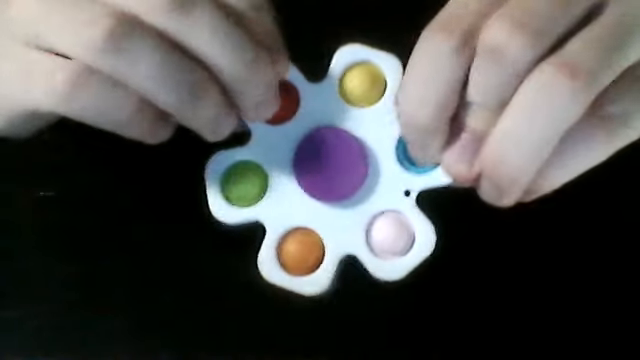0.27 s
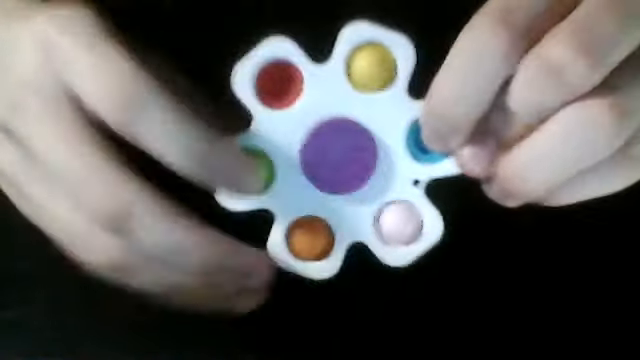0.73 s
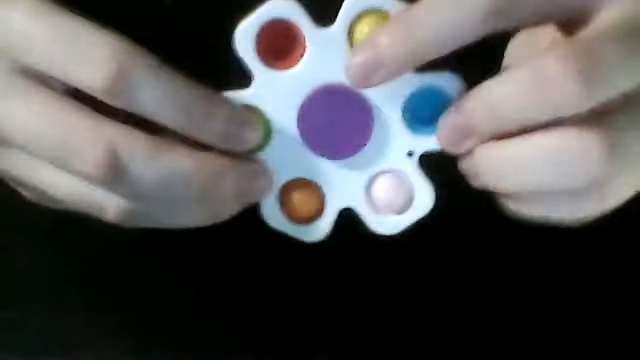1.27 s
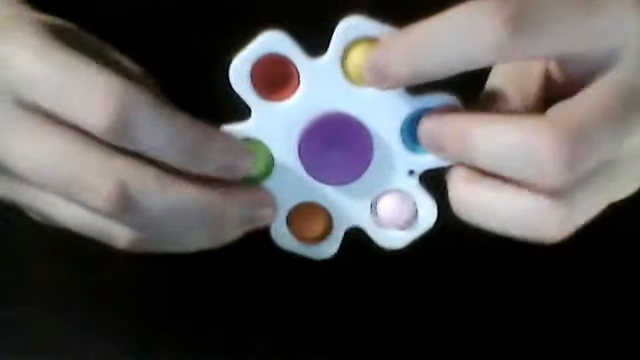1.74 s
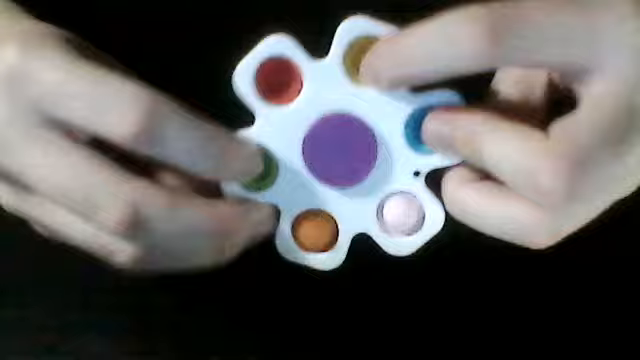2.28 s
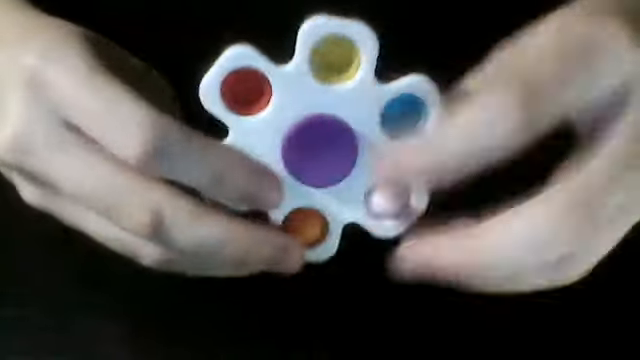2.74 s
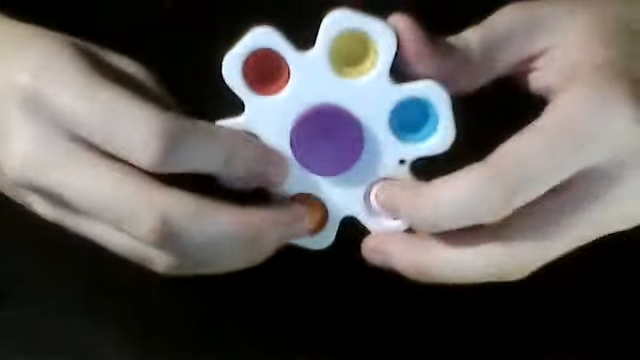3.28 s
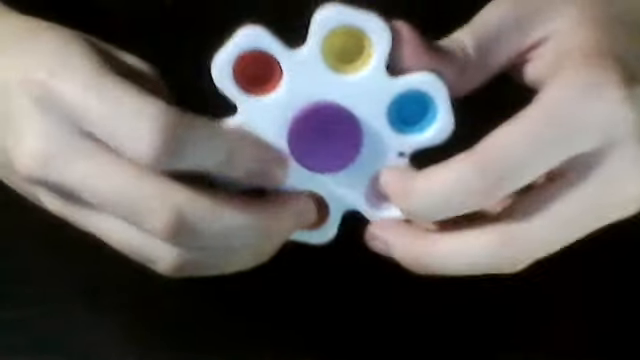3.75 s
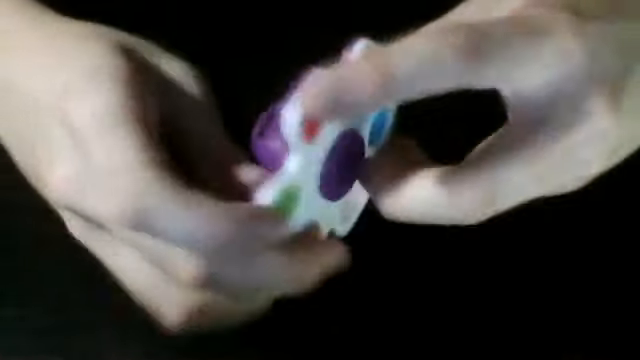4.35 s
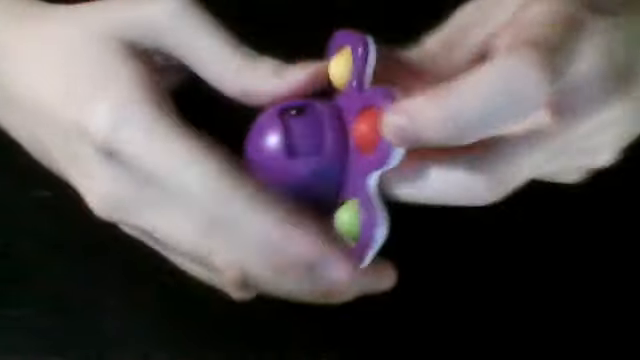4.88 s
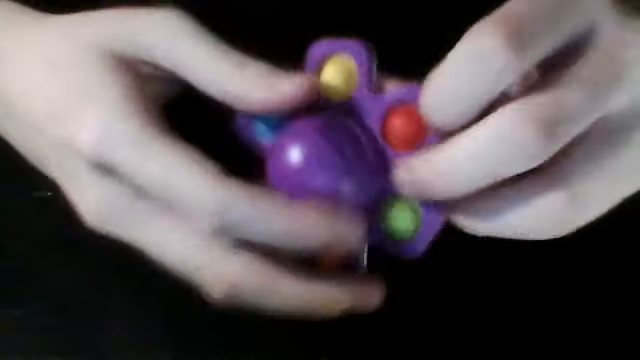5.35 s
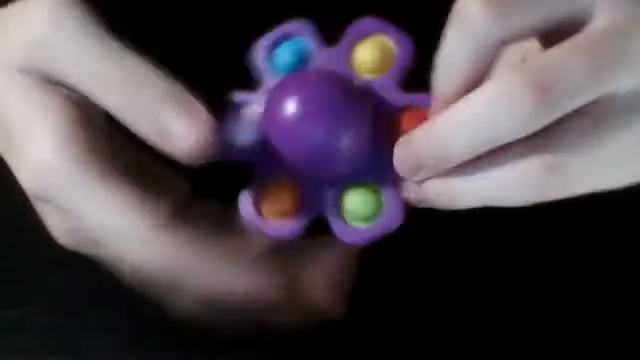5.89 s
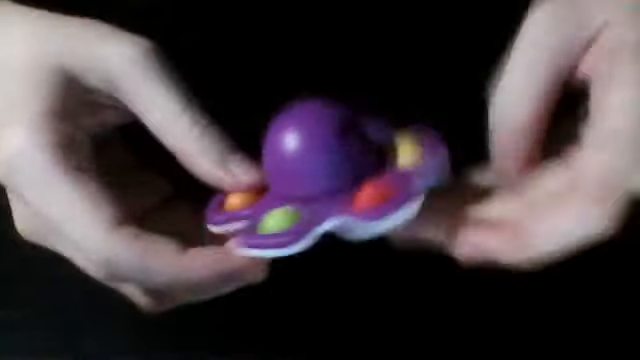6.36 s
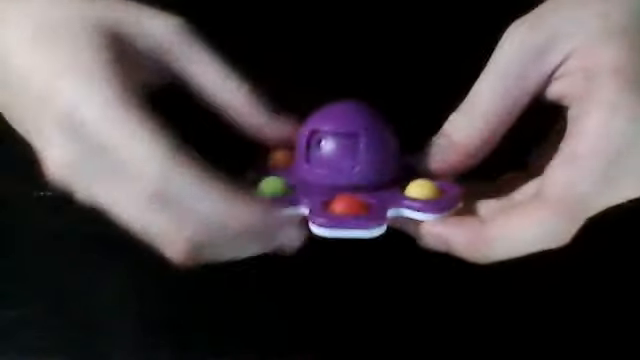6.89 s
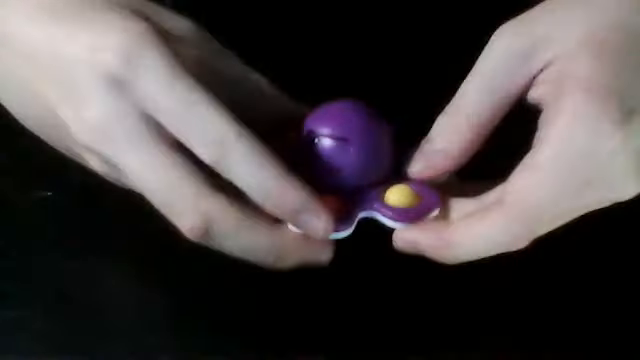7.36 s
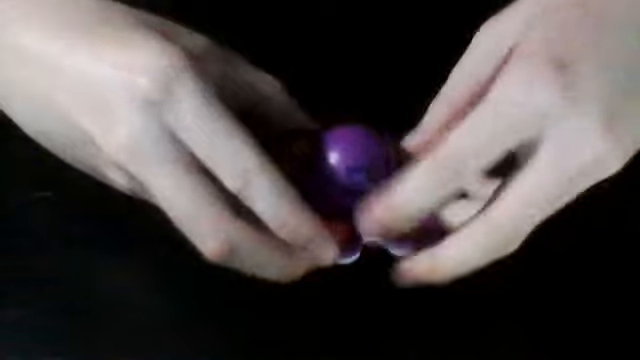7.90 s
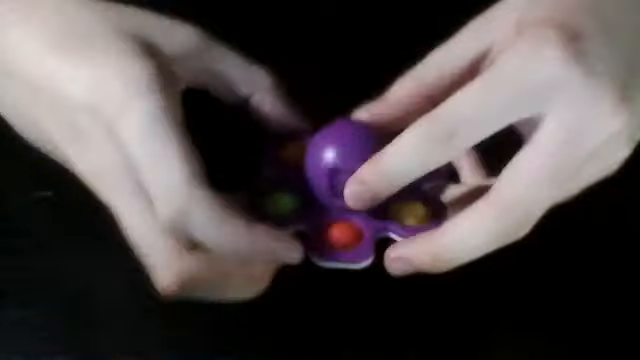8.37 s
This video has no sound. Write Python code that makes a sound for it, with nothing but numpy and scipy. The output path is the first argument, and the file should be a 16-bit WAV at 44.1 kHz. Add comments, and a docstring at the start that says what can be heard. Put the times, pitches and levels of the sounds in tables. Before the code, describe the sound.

Hands snap plastic fidget bubbles with crisp clicks, then turn the toy over with tiny rattles and soft scrapes above faint room hum.

```python
"""A quiet room: two hands play with a plastic pop fidget toy close to a small microphone.
Six silicone bubbles snap through, each a filtered impulse ringing the bubble's modes; the room rings after.
The toy is also turned over: loose parts tick in chattering contacts, fingers stick and slip on the shell.
Under it lie soft hand bumps, steady air, a faint machine hum and the low boom of the desk."""
import sys
import numpy as np
from scipy import signal
from scipy.fft import rfft, irfft
from scipy.io import wavfile

SR = 44100
rng = np.random.default_rng(int(sys.argv[2]) if len(sys.argv) > 2 else 0)


def unload_audio(sound):
    """Save the sound as a 16-bit wav file, at the path given as the first command line argument."""
    columns = np.transpose(np.atleast_2d(sound))
    # keep every value between -1 and 1, then stretch to whole-number steps
    steps = np.round(np.clip(columns, -1, 1) * 32767)
    wavfile.write(sys.argv[1], SR, steps.astype(np.int16))


N = 380141
TIME = np.arange(N) / SR
HIT_SIZE = 4096  # samples in one hit
HIT_TIME = np.arange(HIT_SIZE) / SR
HIT_HZ = np.fft.rfftfreq(HIT_SIZE, 1 / SR)
LEAD_S = .002  # room for the filter ringing ahead of a hit


def pops(bounce_s=.0004, bounce=0.76, low_hz=500, soft_hz=7800,
         hollow_dips=((810, 150, .6), (1890, 170, .85), (3100, 220, .65)),
         detune=.02, scatter_db=4.0, dip_depth=.85, dip_width_hz=450, trim_db=1):
    """Each snap rings the bubble and bounces between the fingers; the shell cuts dips (Hz, width Hz, depth)."""
    # bubbles snapping through: (time [s], centre of a treble dip in this pop [Hz], then 10 ms rms before trim:
    # thud [dB], body [dB], ring [dB], clack [dB], crack [dB], edge [dB])
    snaps = [(0.1631, 4250, -35.5, -30, -28, -27.5, -30, -31.5),
             (0.3276, 3650, -37, -28.5, -27, -25, -33.5, -36),
             (2.1152, 5350, -36.5, -28, -30, -30, -40.5, -34.5),
             (2.1386, 5150, -41, -36.5, -38.5, -35.5, -38, -38.5),
             (3.5004, 3550, -39.5, -28.5, -30, -29.5, -31, -36),
             (3.5596, 5750, -42.5, -31, -33, -33.5, -45.5, -46)]
    # limits of those six bands: (frequency [Hz])
    edges_hz = [300, 900, 2000, 3300, 5000, 6200, 9000]
    # modes of a bubble, before detune and scatter: (frequency [Hz], width [Hz], relative level [dB])
    bubble_modes = [(656, 111.5, -3.5), (1028, 190, -4), (1480, 610, -1), (1705.5, 240, 0), (2196, 260, -5),
                    (2420, 190, -2), (2560, 240, 0), (3360, 396, -8), (3790, 380, -4.5), (4680, 450, -1.5),
                    (5000, 510, -8.5), (5580, 440, -5.5), (6660, 340, -1.5), (6830, 370, -8)]

    hollow = 1
    for hz, width_hz, depth in hollow_dips:
        hollow = hollow * (1 - depth * resonance(HIT_HZ, hz, width_hz))
    # the snap takes a finite time, so the very top is weak
    softness = 1 / np.sqrt(1 + (HIT_HZ / soft_hz) ** 20)
    outlet = highpass(HIT_HZ, low_hz, order=5) * hollow * softness

    out = np.zeros(N)
    mode_hz, mode_width_hz, mode_db = np.transpose(bubble_modes)
    for time_s, dip_hz, *band_db in snaps:
        # each press stretches the membrane a little differently
        stretch, weight = rng.standard_normal((2, len(bubble_modes)))
        pressed_hz = mode_hz * (1 + detune * stretch)
        pressed_db = mode_db + scatter_db * weight
        body = ring(HIT_HZ, zip(pressed_hz, mode_width_hz, pressed_db))
        delay = np.exp(-2j * np.pi * HIT_HZ * bounce_s * rng.uniform(.8, 1.4))
        bounces = (bounce - delay) / (1 - bounce * delay)  # allpass
        treble_dip = 1 - dip_depth * resonance(HIT_HZ, dip_hz, dip_width_hz)
        snap = body * outlet * treble_dip * bounces
        add(out, strike(snap, edges_hz, band_db), time_s - LEAD_S)
    return out * undb(trim_db)


def ticks(chatter=0.18, spread_db=6, trim_db=0):
    """A first contact and a dying chatter of smaller ones ring the shell."""
    # knocks of loose plastic parts:
    # (time [s], 10 ms rms of ring [dB], crack [dB], edge [dB], chatter decay time [s])
    knocks = [(0.421, -52, -60, -60, 0.0024), (0.432, -47, -58, -60, 0.002),
              (0.558, -66.5, -80, -80, 0.0018), (0.815, -65.5, -76, -61, 0.011),
              (0.83, -53, -72, -49.5, 0.0025), (0.855, -59.5, -82, -80, 0.0064),
              (1.072, -73, -74.5, -58, 0.0041), (1.369, -71.5, -73, -72.5, 0.0063),
              (1.566, -76.5, -73, -55, 0.0018), (2.7099, -51.5, -52.5, -47.5, 0.0056),
              (2.714, -53.5, -48, -53, 0.0028), (2.741, -53.5, -55, -62, 0.014),
              (2.752, -53, -62, -56.5, 0.0021), (2.816, -61, -73, -59.5, 0.0074),
              (4.248, -74.5, -71, -73, 0.0071), (4.308, -66, -80, -67.5, 0.0047),
              (4.456, -63.5, -82, -77, 0.0055), (4.933, -58, -57, -70, 0.009),
              (5.176, -76, -75, -89.5, 0.0049), (5.426, -72.5, -73, -92, 0.0044),
              (5.812, -58.5, -67, -79, 0.013), (5.865, -62, -64, -89, 0.0066),
              (6.013, -60.5, -53, -81, 0.0088), (6.06, -58, -53.5, -78, 0.017),
              (6.26, -82, -71.5, -79, 0.0032), (6.714, -61, -71, -66.5, 0.0072),
              (6.757, -65.5, -83, -75, 0.0094), (6.835, -60.5, -76, -58.5, 0.025),
              (6.906, -64, -76, -80, 0.0079), (8.232, -67, -71, -86, 0.0033),
              (8.526, -59, -57.5, -61.5, 0.003)]
    # limits of those three bands: (frequency [Hz])
    edges_hz = [2100, 3300, 6600, 9000]

    out = np.zeros(N)
    body = shell(HIT_HZ)
    for time_s, *band_db, decay_s in knocks:
        sign, size = rng.standard_normal((2, HIT_SIZE))
        roughness = unit(sign * undb(spread_db * size))
        contacts = chatter * roughness * np.exp(-HIT_TIME / decay_s)
        contacts[0] += 1  # first contact
        add(out, strike(rfft(contacts) * body, edges_hz, band_db), time_s - LEAD_S)
    return out * undb(trim_db)


def rubbing(slips_per_s=600, spread_db=4, catches_per_s=70, catch_db=12, trim_db=-1,
            edge_hz=(5500, 7200), dome_hz=4910, dome_width_hz=240):
    """Skin sticks and slips on the shell in many tiny uneven steps, and now and then catches harder."""
    # finger slides: (time of peak [s], peak rms before trim [dB], attack [s], release [s],
    # top sizzle relative to body [dB], round dome's ring relative to body [dB])
    slides = [(0.835, -63, 0.016, 0.023, 2, -20), (0.915, -64, .02, 0.045, 3, -20),
              (1.1, -71, .015, .04, -6, -22), (1.29, -73, 0.022, 0.028, -7, -20),
              (1.58, -65.5, 0.027, 0.024, 10, -20), (2.713, -56, 0.01, .03, -1, -19),
              (2.83, -67.5, .04, 0.07, -6, -20), (4.3, -77, 0.055, 0.052, -1, -15),
              (4.487, -67.5, .012, .025, 5, -17), (4.62, -76, .02, 0.049, -2.5, -20),
              (4.805, -66.5, .004, 0.033, 6, -15), (4.99, -71, 0.041, 0.033, -12.5, -13),
              (5.825, -63.5, 0.058, .035, -10, -4), (6.06, -62.5, 0.062, 0.054, -13, -5),
              (6.845, -64, 0.024, 0.046, -3, -11), (8.28, -74.5, 0.036, 0.043, 2, -8),
              (8.52, -58, 0.011, 0.039, -3, -19)]

    f = np.fft.rfftfreq(N, 1 / SR)
    small_steps = rng.random(N) < slips_per_s / SR
    catches = rng.random(N) < catches_per_s / SR
    steps = small_steps + undb(catch_db) * catches
    signs = rng.choice([-1, 1], N)
    slips = rfft(steps * signs * undb(spread_db * rng.standard_normal(N)))

    scrape = slips * shell(f)
    top = np.interp(f, edge_hz, [0, 1])
    body = unit(irfft(scrape * (1 - top), N))
    sizzle = unit(irfft(scrape * top, N))
    dome = unit(irfft(slips * resonance(f, dome_hz, dome_width_hz), N))

    out = np.zeros(N)
    for time_s, peak_db, attack_s, release_s, sizzle_db, dome_db in slides:
        # nails sizzle, soft finger pads do not; the dome rings when it is free of the hand
        colour = unit(body + undb(sizzle_db) * sizzle + undb(dome_db) * dome)
        out += undb(peak_db) * swell(time_s, attack_s, release_s) * colour
    return out * undb(trim_db)


def creaks(per_s=9, spread_db=3.5, level_db=-92, dull_hz=5000):
    """The shifting grip sets off tiny stray ticks in the shell, muffled by the fingers."""
    f = np.fft.rfftfreq(N, 1 / SR)
    slips = (rng.random(N) < per_s / SR) * undb(spread_db * rng.standard_normal(N))
    muffling = 1 / (1 + 1j * f / dull_hz) ** 2
    return unit(irfft(rfft(slips) * shell(f) * muffling, N)) * undb(level_db)


def shell(f, low_hz=2200):
    """Response of the stiff shell, which speaks only in the treble."""
    # modes of the hard shell, before the highpass: (frequency [Hz], width [Hz], relative level [dB])
    shell_modes = [(1439, 180, -14), (2249, 140, -26), (2720, 66, -6), (2838, 63, 3.5), (2906, 43, -1.5),
                   (3690, 250, -16), (4692, 100, -16.5), (4947, 93, -11), (5515, 90, -15.5),
                   (6250, 220, -12.5), (6600, 200, -10.5), (6840, 260, -8), (7220, 200, 2.5),
                   (7337, 160, -4), (8700, 760, -14.5)]
    return ring(f, shell_modes) * highpass(f, low_hz, order=3)


def strike(spectrum, edges_hz, band_db):
    """One hit as a waveform; where and how hard it lands sets the strength of each band."""
    bands = list(zip(edges_hz[:-1], edges_hz[1:]))
    power = [np.sum(abs(spectrum[(HIT_HZ >= lo) & (HIT_HZ < hi)]) ** 2) for lo, hi in bands]
    now_db = 10 * np.log10(2 * np.array(power) / HIT_SIZE / (.01 * SR))  # rms over 10 ms
    # gain slides from band centre to band centre
    gain = undb(np.interp(HIT_HZ, np.mean(bands, axis=1), np.array(band_db) - now_db))
    lead = np.exp(-2j * np.pi * HIT_HZ * LEAD_S)
    return irfft(spectrum * gain * lead)


def ring(f, modes):
    """Response of a body with these modes."""
    return sum(undb(db) * resonance(f, hz, width_hz) for hz, width_hz, db in modes)


def resonance(f, hz, width_hz):
    """Response of one damped mode, gain 1 at its centre."""
    return 1j * f * width_hz / (hz ** 2 - f ** 2 + 1j * f * width_hz)


def highpass(f, hz, order):
    """Butterworth response of a small body that radiates weakly below hz."""
    return signal.freqs(*signal.butter(order, hz, "high", analog=True), f)[1]


def swell(time_s, attack_s, release_s):
    """Gain that builds up to 1 at time_s and dies away after it."""
    return np.exp(-np.maximum((time_s - TIME) / attack_s, (TIME - time_s) / release_s))


def undb(db):
    """Decibels to gain."""
    return 10 ** (np.asarray(db) / 20)


def unit(x):
    """Scale to rms 1."""
    return x / np.sqrt(np.mean(x ** 2))


def add(out, x, time_s):
    """Mix x into out at time_s."""
    i = int(time_s * SR)
    out[i:i + len(x)] += x[:N - i]


def room(x, desk_s=.0064, desk_db=-25, wall_s=0.011, build_s=0.0096, wet_db=-13, near_db=-3):
    """One return from the desk, then the walls answer with a dense ring that builds and fades."""
    # the room's ring: (band centre [Hz], t60 [s], relative level [dB])
    room_bands = [(445.5, 0.22, -4), (600, 0.3, 4), (730, 0.46, 0), (940, 0.46, 1), (1380, .36, -2.5),
                  (1750, 0.43, -0.5), (2231, 0.32, -3), (2751, 0.41, -1), (3570, 0.31, -3.5),
                  (4338, 0.32, 0.5), (4987, 0.31, -2), (5909, 0.4, -2), (6376, 0.27, -0.5),
                  (8000, 0.28, 0.5)]

    t = np.arange(SR * 3 // 4) / SR
    f = np.fft.rfftfreq(len(t), 1 / SR)
    noise = rfft(rng.standard_normal(len(t)))
    centres_hz = [row[0] for row in room_bands]
    tail = np.zeros(len(t))
    # each share is 1 at its own centre and 0 at the others
    for share, (_, t60_s, db) in zip(np.eye(len(room_bands)), room_bands):
        band = irfft(noise * np.interp(f, centres_hz, share), len(t))
        tail += undb(db) * band * np.exp(-np.log(1000) * np.maximum(t - build_s, 0) / t60_s)
    tail *= np.where(t < wall_s, undb(near_db) * t / wall_s, 1)
    echoes = undb(wet_db) * tail / np.sqrt(np.sum(tail ** 2))
    echoes[int(desk_s * SR)] += undb(desk_db)
    return signal.fftconvolve(x, echoes)[:N]


def bumps(rise_s=.022):
    """A hand bumps the desk or toy; flesh lands slowly, so each is a dull swell of a low sine."""
    # soft bumps: (start [s], pitch [Hz], envelope peak [dB])
    hand_bumps = [(0.01, 55, -53), (2.16, 94, -59.5), (5.77, 54.4, -57), (6.83, 174.6, -62.5)]
    out = np.zeros(N)
    t = TIME[:SR // 4]
    for time_s, hz, peak_db in hand_bumps:
        envelope = t / rise_s * np.exp(1 - t / rise_s)
        add(out, undb(peak_db) * envelope * np.sin(2 * np.pi * hz * t), time_s)
    return out


def jostling(rest_db=-75.5):
    """Gain of the desk's boom: a smooth swell for each lean, added in power to the resting hands."""
    # hands leaning on the desk: (time of peak [s], peak of the added swell [dB], length [s])
    desk_leans = [(0.269, -62, .17), (2.178, -64, .06), (2.723, -68.5, 0.12), (4.1, -73, .4),
                  (5.854, -65.5, 0.2), (6.5, -73, .35), (8.33, -68, .13)]
    power = undb(rest_db) ** 2
    for time_s, peak_db, length_s in desk_leans:
        power = power + undb(peak_db) ** 2 * np.exp(-((TIME - time_s) / length_s) ** 2)
    return np.sqrt(power)


def background(desk_hz=53, desk_width_hz=16, air_level_db=-70.5):
    """Steady air, a wavering hum and the low boom of the desk under the hands, all filtered noise."""
    # room air, before the highpass: (frequency [Hz], relative density [dB per Hz])
    air_curve = [(70, -14), (130, -6.5), (170, -6), (225, -8), (280, -8), (340, -8.5), (630, -8),
                 (750, -15.5), (1000, -9), (1700, -14.5), (2800, -22.5), (4500, -27.5), (7200, -30.5),
                 (9000, -39.5)]
    # machine hum: (frequency [Hz], width before squaring the response [Hz], rms level [dB])
    hum_lines = [(96.5, 15, -77), (164.16, 11, -87.5), (277.5, 10, -85.5)]

    f = np.fft.rfftfreq(N, 1 / SR)
    air_noise, desk_noise, hum_noise = rfft(rng.standard_normal((3, N)))
    curve_hz, curve_db = np.transpose(air_curve)
    air_gain = undb(np.interp(np.log(f + 1), np.log(curve_hz), curve_db))
    air = unit(irfft(air_noise * air_gain * highpass(f, desk_hz, order=4), N))
    desk = unit(irfft(desk_noise * resonance(f, desk_hz, desk_width_hz) ** 2, N))
    hum = np.zeros(N)
    for hz, width_hz, db in hum_lines:
        hum += undb(db) * unit(irfft(hum_noise * resonance(f, hz, width_hz) ** 2, N))
    return air * undb(air_level_db) + desk * jostling() + hum


def scene():
    """The toy, its room, the bumps and the background."""
    toy = pops() + ticks() + rubbing() + creaks()
    return (toy + room(toy) + bumps() + background())[None]


def record(dry, soft_hz=8200, top_hz=8650):
    """The small microphone's top rolls off and then stops steeply."""
    rolloff = 1 / np.sqrt(1 + (np.fft.rfftfreq(N, 1 / SR) / soft_hz) ** 20)
    softened = irfft(rfft(dry) * rolloff, N)
    return signal.sosfilt(signal.ellip(8, .2, 70, top_hz, fs=SR, output="sos"), softened)


dry = scene()
out = record(dry)
unload_audio(out)
```